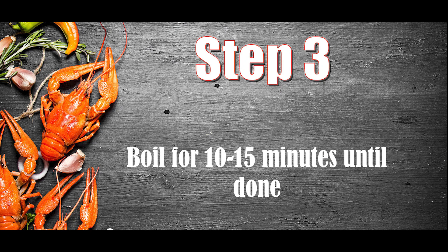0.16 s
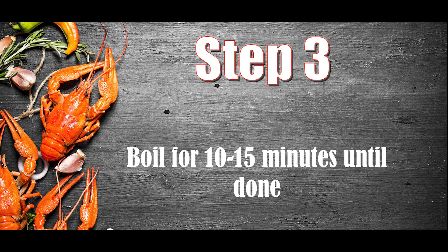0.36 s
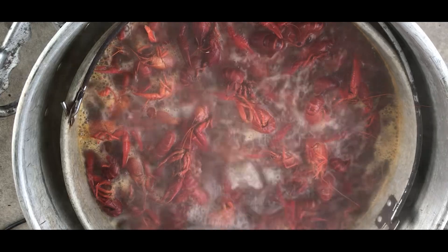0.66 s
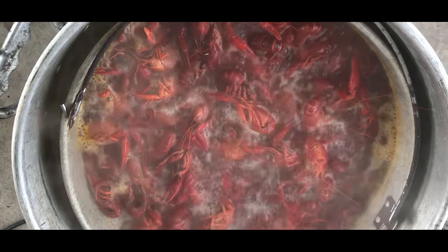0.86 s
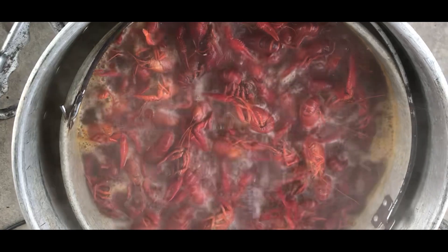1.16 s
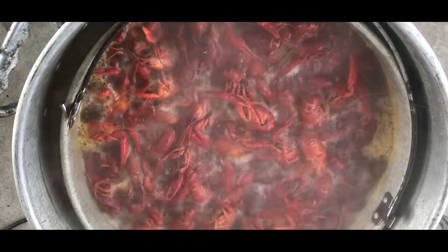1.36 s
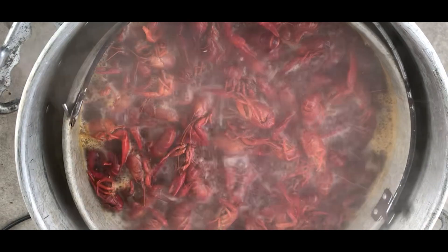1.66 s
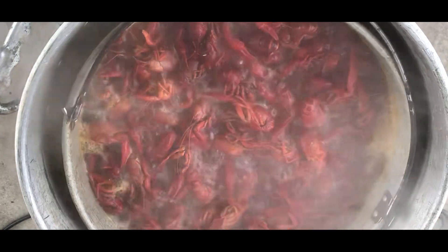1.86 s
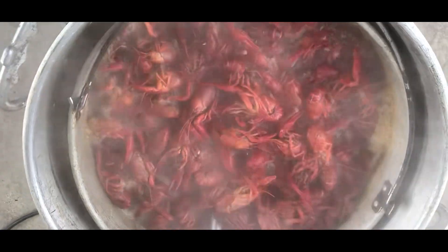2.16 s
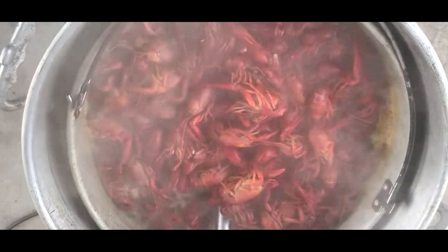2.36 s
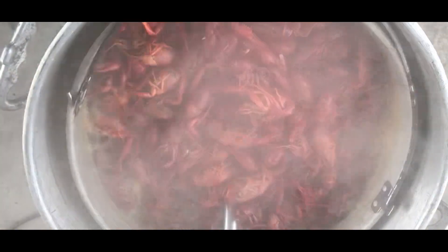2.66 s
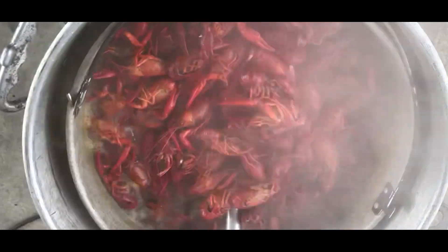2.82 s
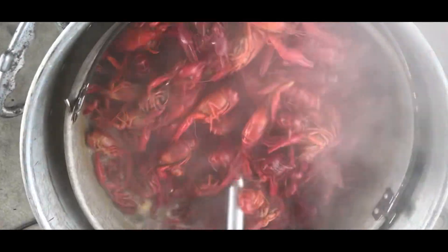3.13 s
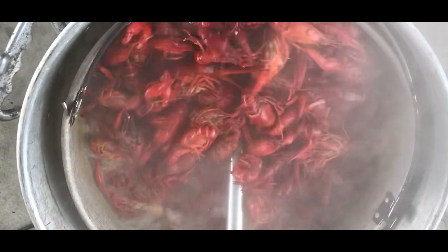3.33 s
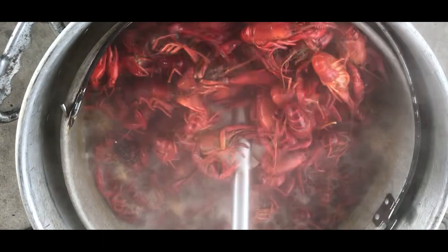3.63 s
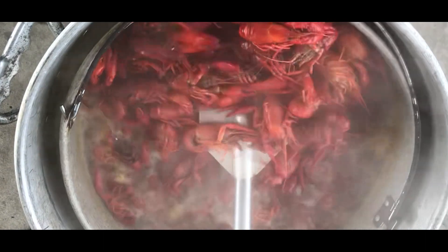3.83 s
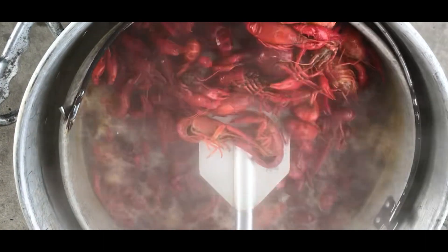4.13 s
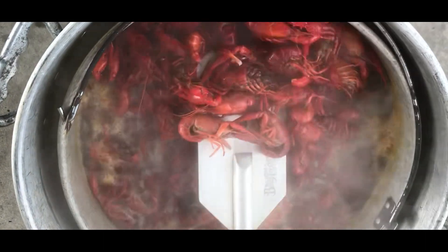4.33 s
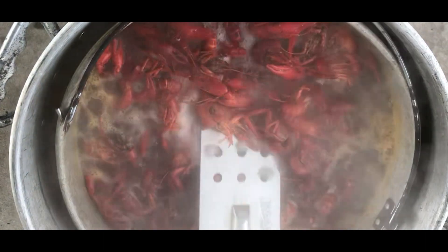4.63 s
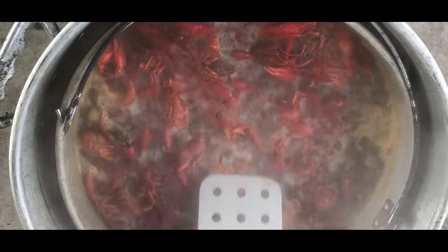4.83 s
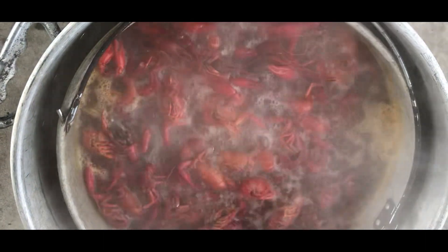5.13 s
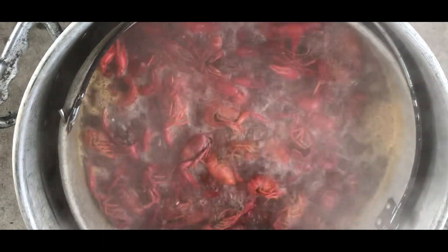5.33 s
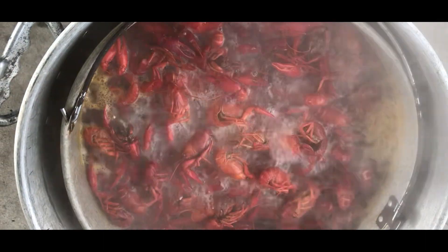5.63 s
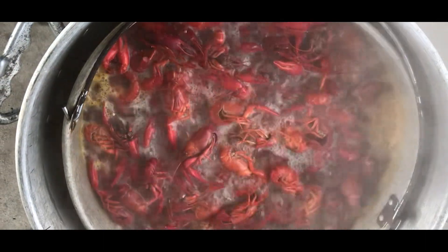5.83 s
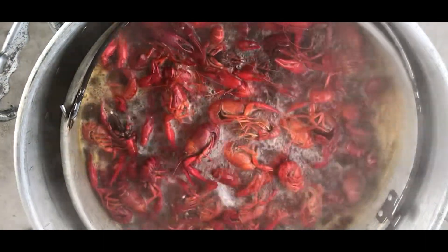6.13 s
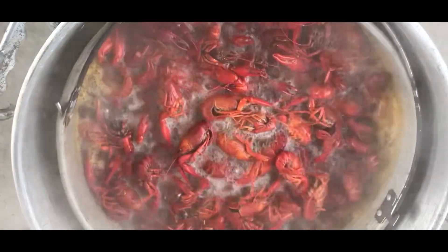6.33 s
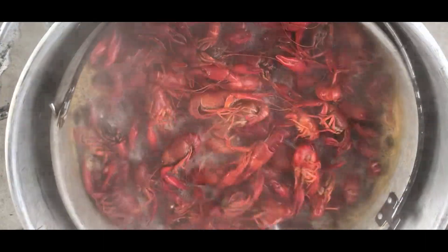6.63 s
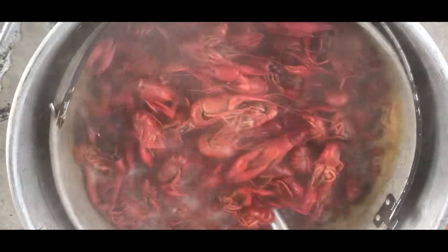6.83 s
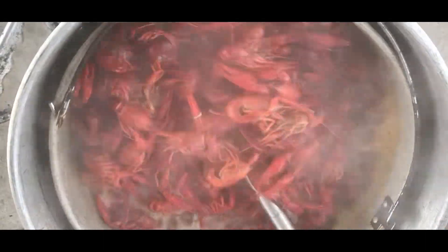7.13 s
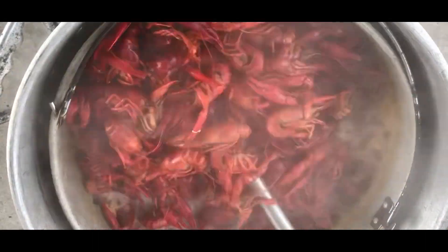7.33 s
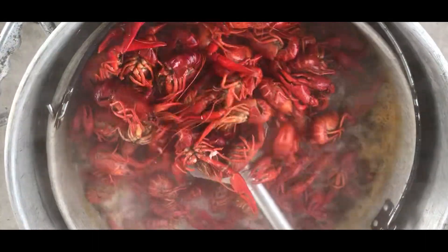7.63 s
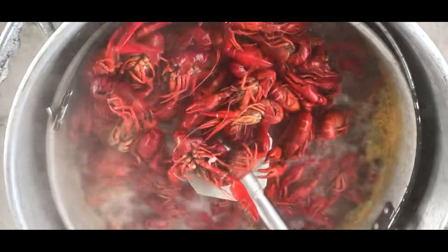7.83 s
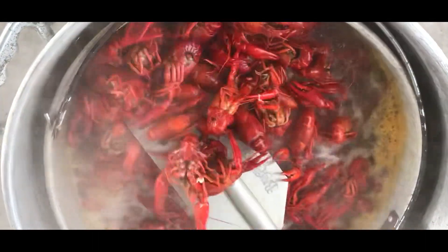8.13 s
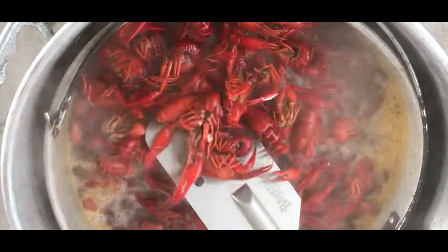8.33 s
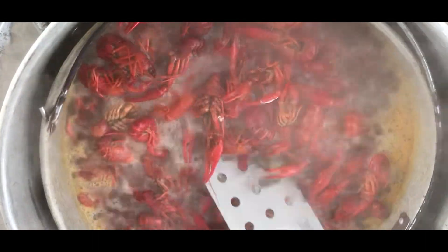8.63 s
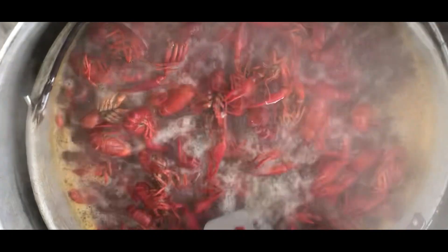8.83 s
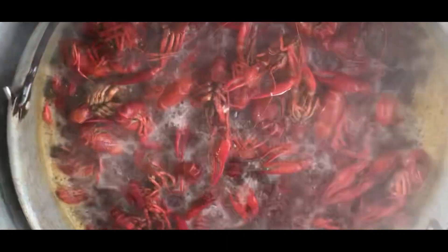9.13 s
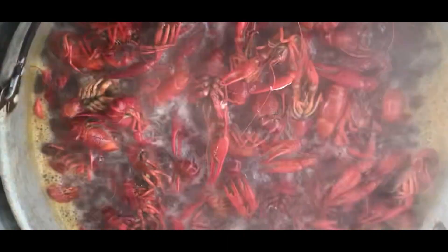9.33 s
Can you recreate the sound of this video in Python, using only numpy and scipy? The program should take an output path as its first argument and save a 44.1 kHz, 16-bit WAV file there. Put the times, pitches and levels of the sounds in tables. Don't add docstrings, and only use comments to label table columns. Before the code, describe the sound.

After brief silence, a gas burner's steady roar and hiss cuts in under a boiling pot, with shell ticks, cracks and two metallic clatters on the rim.

```python
import sys
import numpy as np
from scipy import signal
from scipy.fft import rfft, irfft, next_fast_len
from scipy.io import wavfile
from scipy.ndimage import uniform_filter1d, map_coordinates

SR = 44100
rng = np.random.default_rng(int(sys.argv[2]) if len(sys.argv) > 2 else 0)


def dump_mix(stems):
    frames = np.atleast_2d(stems).T
    limited = np.clip(frames, -1, 1)
    pcm = np.round(limited * 32767).astype(np.int16)
    wavfile.write(sys.argv[1], SR, pcm)


def volts_from_db(level):
    exponent = np.asarray(level, float) / 20
    return 10 ** exponent


N = 417627
T = np.arange(N) / SR
SHORT = SR // 10

# time in seconds, level in dB.
BOIL_DB = [(.95, 0), (1.4, 3), (1.55, 0.5), (1.8, 0.5), (2.87, -1.5), (3.25, 1.5), (3.56, -.5), (4.5, 0),
           (4.98, -3), (5.43, -2.5), (5.57, 6.5), (5.7, 0), (5.9, 1.4), (7.05, 1.5), (7.74, 0.5), (8.2, 2),
           (8.85, -1), (9.47, -1.5)]


def unit(x):
    return x / np.sqrt(np.mean(x ** 2) + 1e-20)


def curves(rows):
    s, *cols = np.transpose(rows)
    return [np.interp(T, s, c) for c in cols]


def wobble(rate_hz):
    return map_coordinates(rng.standard_normal(int(N * rate_hz / SR) + 4), [T * rate_hz])


def coloured(x, gain):
    m = next_fast_len(N + 8192)
    hz = np.fft.rfftfreq(m, 1 / SR) + 1
    return irfft(rfft(x, m) * gain(hz), m)[..., :N]


def turbulence(gain, patchy_db):
    z = signal.stft(rng.standard_normal(N), nperseg=512)[2]
    field = uniform_filter1d(rng.standard_normal(z.shape), size=4, axis=0)
    field = uniform_filter1d(field, size=16, axis=1)
    patchy = signal.istft(z * volts_from_db(patchy_db * unit(field)), nperseg=512)[1][:N]
    return unit(coloured(patchy, gain))


def modes(table):
    def gain(f):
        power = 0
        for c, w, db in table:
            peak = (f * w) ** 2 / ((c * c - f * f) ** 2 + (f * w) ** 2)
            power = power + volts_from_db(2 * db) * peak ** 1.555
        return np.sqrt(power)
    return gain


def resonant(table):
    def gain(f):
        total = 0
        for k, (c, w, db) in enumerate(table):
            total = total + (-1) ** k * volts_from_db(db) * 1j * f * w / (c * c - f * f + 1j * f * w)
        return total
    return gain


def slope(points):
    hz, db = np.transpose(points)
    return lambda f: volts_from_db(np.interp(np.log(f), np.log(hz), db))


def burst(lo_hz, hi_hz, t60_s):
    puff = rng.standard_normal(SHORT) * volts_from_db(-60 * T[:SHORT] / t60_s)
    band = signal.butter(2, [lo_hz, hi_hz], "band", fs=SR, output="sos")
    out = signal.sosfilt(band, puff)
    return out / np.abs(out).max()


def damped(hz, t60_s, rise_s, size=SHORT):
    t = T[:size]
    envelope = volts_from_db(-60 * t / t60_s) * (1 - np.exp(-t / rise_s))
    return envelope * np.sin(2 * np.pi * hz * t + rng.uniform(0, 2 * np.pi))


def add(track, s, sound):
    track[round(s * SR):][:len(sound)] += sound


def ringing(s, table, boost_db, t60_s, rise_s, tilt):
    track = np.zeros(N + SR)
    for hz, db in table:
        mode_t60_s = t60_s * (hz / 5000) ** tilt * rng.uniform(0.68, 1.42)
        add(track, s, volts_from_db(db + boost_db) * damped(hz, mode_t60_s, rise_s, size=SR // 3))
    return track[:N]


def clatter(contacts, colour, metal, dry_db):
    rattle = np.zeros(N + SR)
    for s, db, t60_s, top_hz in contacts:
        add(rattle, s, volts_from_db(db + 11.5) * burst(470, top_hz, t60_s))
    touching = resonant([(hz, 55, 2) for hz, _ in metal])
    return coloured(rattle[:N], lambda f: slope(colour)(f) * (volts_from_db(dry_db) + touching(f)))


def drag(strokes, table):
    edge_s = 0.0055
    push = 0
    for s, length_s, db in strokes:
        inside_s = np.minimum(T - s + edge_s, s + length_s + edge_s - T)
        push = push + volts_from_db(db) * np.clip(inside_s / edge_s, 0, 1)
    return push * volts_from_db(1.3 * wobble(300)) * turbulence(modes(table), patchy_db=3.5)


def froth(count=420):
    track = np.zeros(N + SR)
    boil_db, = curves(BOIL_DB)
    for when, pitch, size, life in rng.uniform(size=(count, 4)):
        hz = 3600 * 4 ** pitch
        blip = damped(hz, (8 + 30 * life) / hz, .0001, size=SR // 60)
        level_db = -46 + boil_db[int(when * N)] - 3.5 * np.log(size + .04)
        add(track, when * N / SR, volts_from_db(level_db) * blip)
    return track[:N]


def hiss():
    # frequency in Hz, density in dB per Hz.
    steam_points = [(1700, -37), (2900, -1.5), (3200, -2.5), (3700, -5), (4300, -4.5), (4600, -3.5),
                    (4950, -7), (5300, -3.5), (5700, -10), (7000, -14), (9100, -38)]
    jet_points = [(3500, -30), (6000, 0.5), (7700, 1.5), (9300, 4), (10100, 1), (10500, -3.5), (11000, 2.5),
                  (12600, 2), (15000, 2), (16500, -6)]
    boil_db, = curves(BOIL_DB)
    puffs_db = .5 * wobble(9) + .7 * wobble(25)
    steam = volts_from_db(-47.5 + boil_db + puffs_db) * turbulence(slope(steam_points), patchy_db=1.9)
    jet = volts_from_db(-49.5 + 0.69 * boil_db + .8 * puffs_db) * turbulence(slope(jet_points), patchy_db=.5)
    return steam + jet


def broth():
    # start in seconds, peak in dB.
    spits = [(0.706, -33), (1.2216, -32), (1.5499, -27), (1.5554, -31), (1.5714, -28), (1.9435, -34),
             (1.957, -37), (3.1028, -35), (3.2194, -36), (3.3538, -34), (3.5828, -33), (3.7614, -31.5),
             (4.0994, -36), (4.5945, -27.5), (5.8531, -30), (6.8694, -38), (7.3794, -34), (8.2392, -33),
             (8.8892, -36), (9.0965, -37), (9.2254, -36), (9.303, -36)]
    faint_spits = [(1.3394, -37), (1.731, -34), (3.2924, -34), (3.8462, -35), (4.1654, -34), (5.8994, -37),
                   (6.0541, -31), (6.1294, -32), (6.9894, -37), (7.2, -32), (7.3632, -32), (7.4784, -32),
                   (7.5494, -35), (7.7294, -34), (8.4467, -35), (8.5344, -36), (9.1794, -38)]
    slops = [(0.706, -29), (1.222, -31), (3.2194, -34), (3.2594, -36), (8.609, -30), (8.6218, -28),
             (8.628, -32), (9.097, -31.5), (9.294, -32), (9.325, -32)]
    track = np.zeros(N + SR)
    for s, db in spits + [(s, db - 2.5) for s, db in faint_spits]:
        add(track, s, volts_from_db(db) * burst(7000, 14100, 0.053))
    for s, db in slops:
        add(track, s, volts_from_db(db) * burst(3200, 4500, 0.066))
    return track[:N]


def snaps():
    # start in seconds, peak in dB, low edge in Hz, high edge in Hz, t60 in seconds.
    snap_rows = [(1.4415, -27, 4200, 14000, .01), (1.6, -25, 3000, 15000, .012),
                 (1.454, -31, 5500, 14000, .01), (5.7645, -29, 5460, 7600, .012),
                 (4.5, -31, 3300, 4300, .02), (5.69, -31, 3800, 5000, .02), (7.205, -33, 3000, 4200, .025),
                 (7.285, -35, 3500, 4300, .025), (8.73, -36, 12000, 15500, .025),
                 (9.321, -30, 4500, 14000, 0.056), (9.295, -28, 2400, 3100, .03),
                 (1.9008, -30, 3000, 6200, .02), (9.097, -27, 12000, 15500, .05),
                 (1.4212, -30, 11000, 15500, .008), (.9565, -13, 4000, 7500, 0.022),
                 (.9655, -15, 1200, 2000, 0.036), (1.8, -30, 1000, 2500, .03), (1.3, -17, 630, 1500, .012),
                 (5.855, -33, 6200, 7400, .06), (5.864, -33, 6200, 7400, .06)]
    track = np.zeros(N + SR)
    for s, db, lo_hz, hi_hz, t60_s in snap_rows:
        add(track, s, volts_from_db(db) * burst(lo_hz, hi_hz, t60_s))
    return track[:N]


def chain():
    # start in seconds, peak in dB, t60 in seconds, ring in dB.
    jingles = [
        (9.0975, -38, 0.037, -9),
        (9.2935, -25, 0.055, -10),
        (9.3443, -23.5, 0.028, -2.5),
        (9.351, -35, .04, -7),
    ]
    # frequency in Hz, level in dB.
    link_modes = [(6450, -39), (8150, -39), (8850, -34), (9500, -39), (11800, -35), (13600, -37),
                  (14400, -40)]
    rings = 0
    for s, db, t60_s, ring_db in jingles:
        rings = rings + ringing(s, link_modes, db + ring_db + 30, 2 * t60_s, rise_s=0.00061, tilt=-.25)
    contacts = [(*row[:3], SR / 2.2) for row in jingles]
    colour = [(2500, -24), (6000, -11), (15000, -13)]  # Hz, dB
    return rings + clatter(contacts, colour, link_modes, dry_db=2.5)


def clinks():
    # start in seconds, peak in dB.
    clink_rows = [
        (8.6435, -32),
        (8.6647, -33),
        (8.6956, -34),
        (.7053, -38),
        (.793, -43),
        (.836, -40),
    ]
    # frequency in Hz, width in Hz, level in dB.
    clink_modes = [
        [(3170, 140, -2), (6290, 94, -1), (8550, 140, -3), (11400, 85, -7), (12200, 130, -4), (14100, 98, -10)],
        [(9280, 310, -1), (10000, 210, -4), (11600, 290, -4), (13100, 210, -7), (13800, 240, 0)],
        [(3460, 210, 0), (8510, 230, -2), (9740, 240, -3), (11800, 460, -3), (12700, 270, -2)],
        [(7390, 89, -4), (8690, 86, -3), (9260, 93, 0), (11100, 93, -4), (12800, 97, -2)],
        [(5320, 100, 0), (6590, 110, -9), (8510, 150, -10), (11300, 120, -7)],
        [(7080, 110, 2), (7690, 89, -6)],
    ]
    track = np.zeros(N + SR)
    for (s, db), table in zip(clink_rows, clink_modes):
        ring = sum(volts_from_db(level_db) * damped(hz, 3.1 / width_hz, .0004) for hz, width_hz, level_db in table)
        add(track, s, volts_from_db(db) * (ring + volts_from_db(3) * burst(5000, 15500, 0.033)))
    return track[:N]


def scrape():
    # start in seconds, length in seconds, level in dB.
    over_shells = [
        (1.489, .017, -38),
        (1.514, 0.03, -39),
        (1.551, 0.015, -31),
        (1.8, .014, -39),
        (1.5, .01, -34),
    ]
    out_of_heap = [
        (8.614, 0.024, -38),
    ]
    handle_slide = [
        (5.535, .05, -45),
        (5.63, .105, -46),
    ]
    # frequency in Hz, width in Hz, level in dB.
    shell_modes = [(4300, 800, 1), (5100, 600, -3), (5800, 900, -2), (7060, 800, -8), (12000, 2700, -13)]
    paddle_modes = [(4000, 600, 0), (6700, 700, -4), (9000, 740, -5), (11800, 900, -9), (13200, 200, -5),
                    (14000, 900, -11)]
    slide_modes = [(3500, 500, -5), (4570, 260, 2), (5200, 300, -8)]
    return drag(over_shells, shell_modes) + drag(out_of_heap, paddle_modes) + drag(handle_slide, slide_modes)


def shell_blow(hz, knock_db, overtone_db, t60_s, puff_db):
    snap = damped(hz, t60_s, t60_s * 0.07) + volts_from_db(overtone_db) * damped(hz * 1.58, 0.0077, 0.00025)
    knock = volts_from_db(knock_db) * damped(1400, 0.012, 0.0002)
    puff = volts_from_db(puff_db) * burst(hz * 0.87, hz * 1.23, 0.031)
    return volts_from_db(6) * (snap + knock + puff)


def ticks():
    # start in seconds, peak in dB, pitch in Hz, knock in dB.
    tick_rows = [(.7951, -43, 3370, 10), (0.8387, -40, 3370, 2), (1.0944, -41, 3650, -5),
                 (1.144, -40, 3750, -3), (1.1694, -35, 4030, 0), (1.431, -33, 4310, 4),
                 (1.4409, -30, 4680, -12), (1.4464, -33, 3330, -9), (1.4875, -34, 4410, -8),
                 (1.5294, -36, 5700, -12), (3.5653, -37, 5400, -7), (4.166, -24.5, 3330, -2),
                 (4.595, -31.5, 3400, -13), (5.6501, -37, 5120, -2), (5.3984, -16, 3850, -10),
                 (5.4102, -22, 3780, -3), (5.418, -16, 3900, -14), (5.422, -22, 3950, -14),
                 (1.9005, -29, 3920, -5), (5.763, -32, 4300, 14), (5.8404, -31, 4250, 7),
                 (1.5758, -32.5, 4300, 9.5), (6.003, -41, 3800, -8), (6.0553, -34, 3470, -5),
                 (7.527, -30, 3500, -11), (8.0282, -39, 4040, -5), (8.243, -32, 5650, -14),
                 (8.26, -35, 4080, -6), (8.535, -34, 3720, -4)]
    # start in seconds, peak in dB.
    taps = [(1.5489, -23), (1.5608, -24), (1.577, -17.5), (1.6, -31), (1.6232, -26), (1.6706, -34),
            (1.9018, -25), (5.8399, -23), (5.8493, -27), (5.854, -15.5), (5.864, -19), (5.8683, -14.5),
            (5.8764, -28), (5.882, -28), (5.8974, -30)]
    track = np.zeros(N + SR)
    for s, db, hz, knock_db in tick_rows:
        blow = shell_blow(hz, knock_db, overtone_db=-12, t60_s=.012, puff_db=-3.5)
        add(track, s, volts_from_db(db) * blow)
    for s, db in taps:
        hz = (4290 - 29 * s) * (1 + .012 * rng.normal())
        blow = shell_blow(hz, knock_db=-9, overtone_db=-22, t60_s=.009, puff_db=-24)
        add(track, s, volts_from_db(db) * blow)
    return track[:N]


def pops():
    # start in seconds, peak in dB.
    cracks = [
        (1.4209, -4),
        (5.7529, -2.5),
    ]
    # frequency in Hz, width in Hz, level in dB.
    crack_modes = [
        [(1710, 270, 4), (2690, 300, -6), (4270, 380, 0), (6160, 600, -4.5), (7360, 530, -5),
         (11000, 1300, -34)],
        [(1300, 240, 4), (2040, 310, -1), (2920, 400, -12), (4230, 250, -2), (6800, 690, -13),
         (11500, 2000, -26)],
    ]
    track = np.zeros(N + SR)
    for (s, db), table in zip(cracks, crack_modes):
        blow = np.zeros(N + SR)
        for delay_s, size in ((.0003, 0.017), (.0008, -2.2), (.0015, .45)):
            add(blow, s + delay_s, size * np.hanning(6))
        crack = coloured(blow[:N], resonant(table))
        track[:N] += volts_from_db(db) * crack / np.abs(crack).max()
        add(track, s + 0.00074, volts_from_db(db - 17) * burst(1200, 6500, 0.028))
    return track[:N]


def handle():
    # start in seconds, peak in dB, t60 in seconds, upper edge in Hz.
    first_contacts = [(.9483, -4, .016, 16000), (.9515, -20, .02, 9000), (.9563, -2.5, .018, 16000),
                      (.959, -8, 0.027, 12000), (.962, -6.5, 0.027, 12000), (.965, -7.5, .025, 8000),
                      (.968, -12, 0.028, 14000), (.9705, -18, .03, 9000), (.9745, -18, .03, 12000),
                      (.979, -21, .05, 14000), (.991, -17, .03, 5980), (.9955, -24, 0.027, 5000),
                      (1.0, -24, .03, 5000), (1.0144, -29, .04, 6000)]
    second_contacts = [(5.3982, -3, 0.019, 16000), (5.4005, -7, .018, 9000), (5.4065, -11, .025, 8000),
                       (5.41, -8, 0.018, 6000), (5.4168, -4, 0.029, 14000), (5.4195, -8, .03, 14000),
                       (5.4225, -10, .03, 14000), (5.425, -11, 0.044, 12000), (5.431, -13, .03, 10000),
                       (5.437, -13, .03, 9000), (5.4415, -13, .03, 12000), (5.446, -11, .03, 9000),
                       (5.4505, -9.5, .03, 14000), (5.455, -17, .03, 12000), (5.4595, -19, .025, 8000),
                       (5.464, -17, .03, 5000), (5.4685, -21, 0.035, 5000)]
    # frequency in Hz, gain in dB.
    first_colour = [(530, -43), (900, -13), (1120, -9), (1290, -18), (1490, 4), (1860, -10), (2540, -12.5),
                    (2800, -6), (3400, -8), (4050, -5), (4730, -13), (5860, -8), (8690, -13.5),
                    (10800, -17), (13200, -17), (15600, -30)]
    second_colour = [(470, -42), (800, -10), (917, 4), (1030, -4.5), (1130, -6), (1510, -12), (1600, -16),
                     (2080, -12), (2640, -6.5), (3300, -8.5), (3800, -3), (4560, -16), (5770, -12),
                     (6300, -15), (11600, -17), (15600, -22)]
    # frequency in Hz, level in dB.
    first_rim = [(1104, -35), (1443, -40), (2396, -52), (2643, -39), (3187, -46), (3639, -41), (4059, -52),
                 (4457, -47), (4820, -47), (5351, -53), (5890, -48), (6368, -55), (6772, -45), (7133, -46),
                 (7413, -49), (7714, -46), (8123, -48), (8414, -46), (8721, -44), (9679, -62), (10298, -61),
                 (11370, -60), (11730, -61), (12861, -50), (13281, -56), (14766, -68)]
    second_rim = [(1160, -29), (2584, -33), (2783, -40), (3214, -36), (3408, -45), (3924, -36), (4274, -40),
                  (4560, -39), (5020, -46), (5609, -36), (5875, -36.5), (6471, -50), (6794, -45),
                  (7424, -46), (7730, -50), (8145, -49), (8753, -48), (9329, -55), (9835, -54),
                  (10314, -55), (10901, -56), (11213, -41), (11380, -52), (12489, -46), (12893, -51),
                  (13566, -60), (14110, -61), (14373, -63)]
    first = clatter(first_contacts, first_colour, first_rim, dry_db=-2.5)
    second = clatter(second_contacts, second_colour, second_rim, dry_db=-4.5)
    first_s, second_s = first_contacts[1][0], second_contacts[3][0]
    first = first + ringing(first_s, first_rim, boost_db=7.5, t60_s=0.39, rise_s=.004, tilt=-.05)
    second = second + ringing(second_s, second_rim, boost_db=10.5, t60_s=0.22, rise_s=0.0068, tilt=0.057)
    return first + second


def flame():
    # time in seconds, level in dB.
    strength = [(.9, -24.5), (1.1, -24), (1.7, -24.5), (2.15, -25), (2.72, -23.5), (3.28, -23.5),
                (4.1, -24), (4.6, -25), (5.1, -24), (5.4, -25), (6.4, -25), (7.35, -23.5), (7.9, -26.5),
                (8.3, -26), (8.96, -26), (9.47, -25.5)]
    # time in seconds, level in dB.
    gas = [(1.05, -44), (1.64, -44), (2.38, -43.5), (2.83, -46), (3.7, -42), (3.89, -39), (4.42, -45.5),
           (4.9, -40), (5.15, -42.5), (5.58, -41), (5.88, -44.5), (6.42, -39), (6.89, -44.5), (7.29, -41),
           (7.61, -46.5), (7.99, -44.5), (8.93, -46.5), (9.47, -44)]
    # time in seconds, lean over the pot in dB, turn towards the rim in dB.
    sway = [(.8, 2.5, 3), (1.2, -0.5, -1), (1.84, -1.5, 2.5), (2.5, 0.5, -7), (3, -4.5, 0.5), (3.4, 1, -5),
            (4.05, 1.5, 6), (4.5, -1.5, 0), (5.1, 2, 0), (5.9, 1, -1), (6.35, 3, 1.5), (6.8, 5, 4),
            (7.25, 2, 6.5), (7.6, -2, 3.5), (8.4, -4, 3.5), (8.9, -3.5, 4), (9.15, -2, 8), (9.47, 0, 6.5)]
    # frequency in Hz, width in Hz, level in dB.
    gap_modes = [(53.5, 28, -12.5), (90.3, 103, -4), (153, 19.2, 1), (202.4, 16, 0.5), (239.2, 22.3, -3.5),
                 (305.9, 33.7, -4.5), (363, 100, -18)]
    roar_modes = [(548.6, 61, -2), (612, 77, -0.5), (668, 90, -0.5), (755, 63, -5.5)]
    tube_modes = [(921.7, 37, 1), (998, 80, -4), (1203, 50, -5), (1331, 124, -1), (1410, 130, -12.5),
                  (1695, 940, -11.5)]
    whistle_modes = [(2597, 95, -2.5), (2698, 89, 3), (2890, 190, -16)]
    wall_low = [(1135, 93, 0)]
    wall_high = [(1870, 130, -12.5), (2078, 63, 1), (2228, 120, 2), (2408, 89, 1.5)]
    # level in dB, share of flame strength,
    # share of lean, share of turn, patchiness in dB.
    parts = [(-25, 0.83, .01, 0.067, 0.84), (-29.5, 0.94, .01, -0.013, 0.2), (-37, 0.25, 0.45, -0.029, 0.8),
             (-41.5, 0.05, 0.05, -0.016, 1.7), (-46, 0.33, .01, 1.22, -0.3),
             (-43.5, 0.4, 1.12, 0.021, 1.46)]
    tables = (gap_modes, roar_modes, tube_modes, whistle_modes, wall_low, wall_high)

    flutter_db = 0.18 * wobble(17) + 0.45 * wobble(30)
    strength_db, = curves(strength)
    strength_db = strength_db - strength_db.mean()
    lean_db, turn_db = curves(sway)
    gas_db, = curves(gas)
    tube_drift_db = wobble(3.47)
    whistle_drift_db = gas_db - gas_db.mean() + 0.2 * wobble(2.76)
    drifts_db = (0, 0, tube_drift_db, whistle_drift_db, 0, 0)

    total = np.zeros(N)
    for (db, by_flame, by_lean, by_turn, patchy_db), drift_db, table in zip(parts, drifts_db, tables):
        level_db = db + by_flame * strength_db + by_lean * lean_db + by_turn * turn_db
        total += volts_from_db(level_db + drift_db + flutter_db) * turbulence(modes(table), patchy_db)
    return total


def scene():
    # delay in seconds, level in dB.
    yard = [
        (.0047, -19),
        (0.0117, -20),
        (0.0215, -17.5),
        (.031, -19),
    ]
    burner = hiss() + flame()
    echoes = sum(volts_from_db(db) * np.pad(burner, (round(s * SR), 0))[:N] for s, db in yard)
    pot = froth() + broth() + snaps() + clinks() + scrape() + ticks() + pops()
    return (burner + echoes + pot + chain() + handle())[None]


def roll_off(x):
    return signal.sosfilt(signal.butter(12, 16250, fs=SR, output="sos"), x)


def record(dry):
    x = coloured(dry, lambda hz: (hz < 15780) / np.sqrt(1 + (44 / hz) ** 11))
    x = x / (1 + np.abs(x / .9) ** 8) ** (1 / 8)
    start_s = .671
    return roll_off(x * (T >= start_s))


dry = scene()
out = record(dry)
dump_mix(out)
```